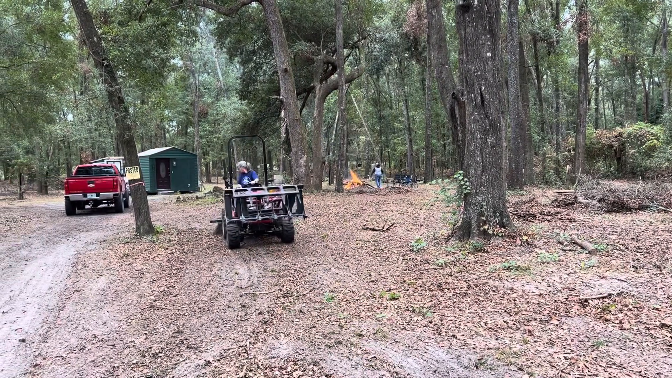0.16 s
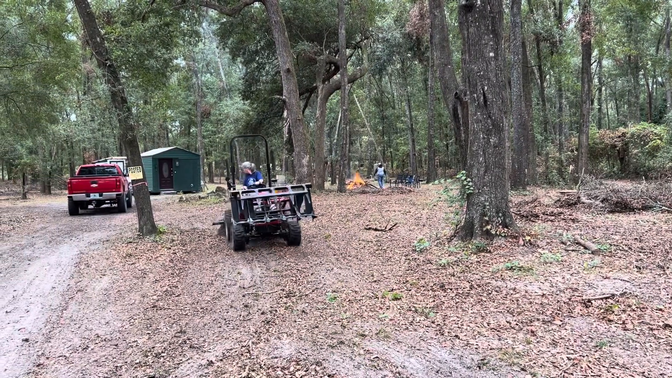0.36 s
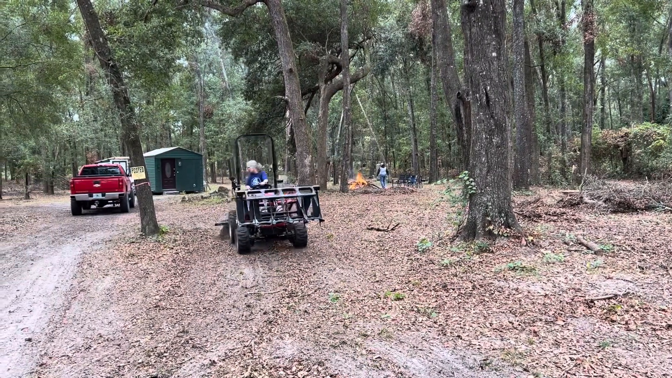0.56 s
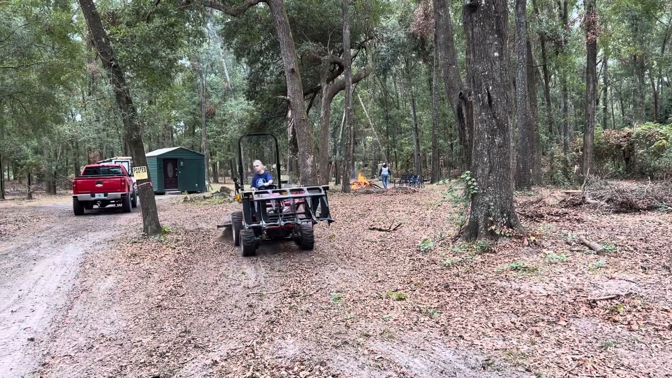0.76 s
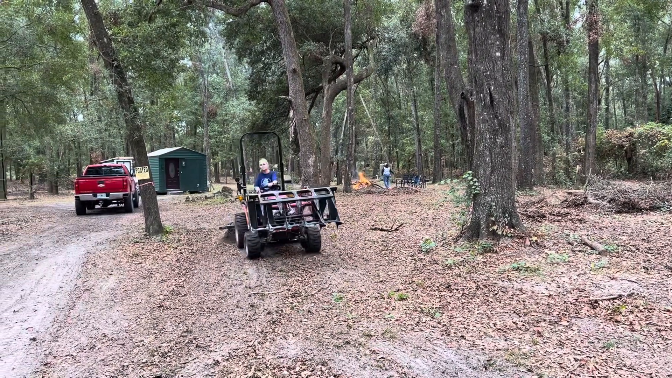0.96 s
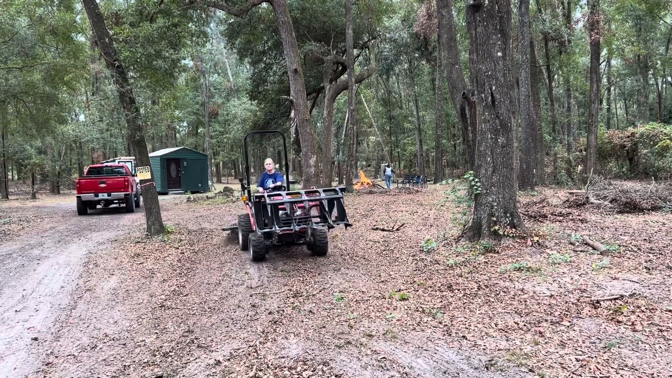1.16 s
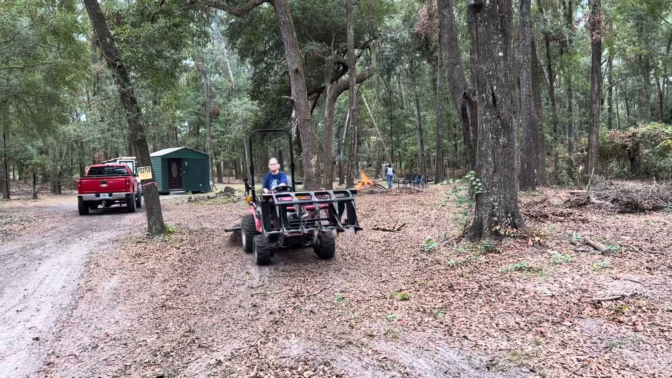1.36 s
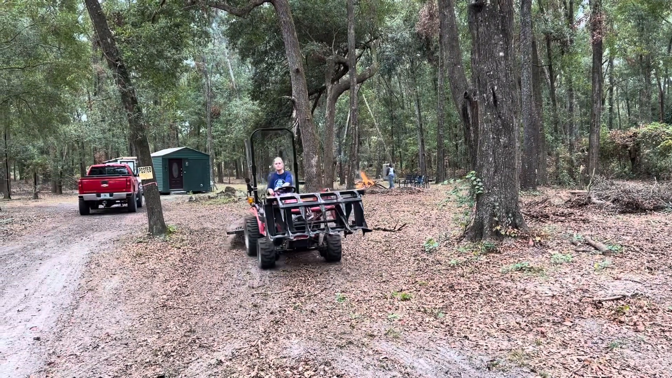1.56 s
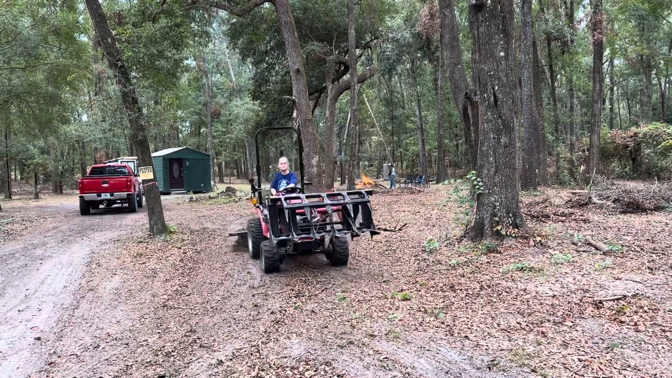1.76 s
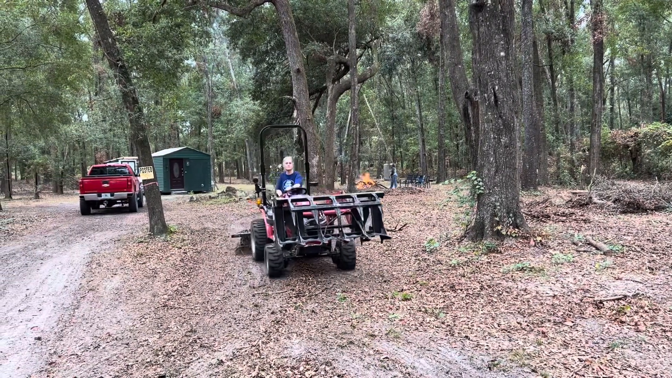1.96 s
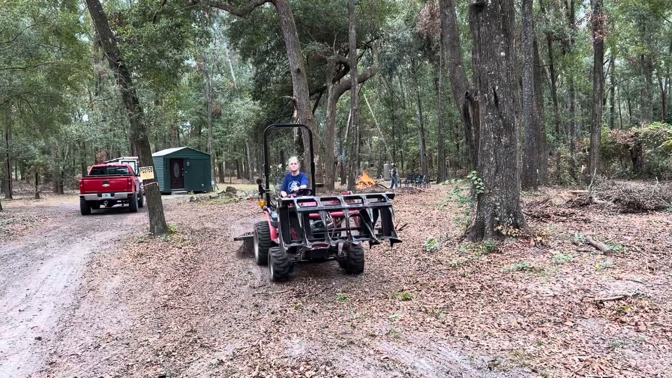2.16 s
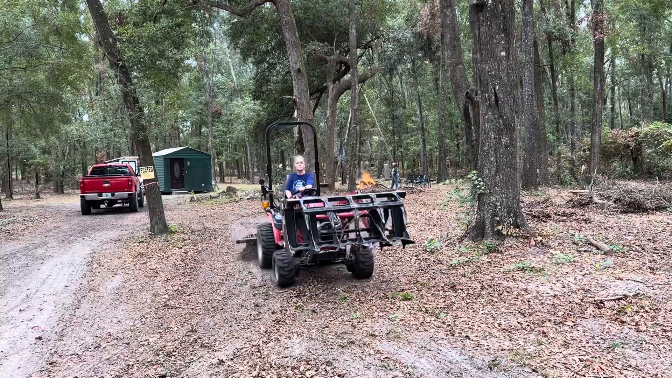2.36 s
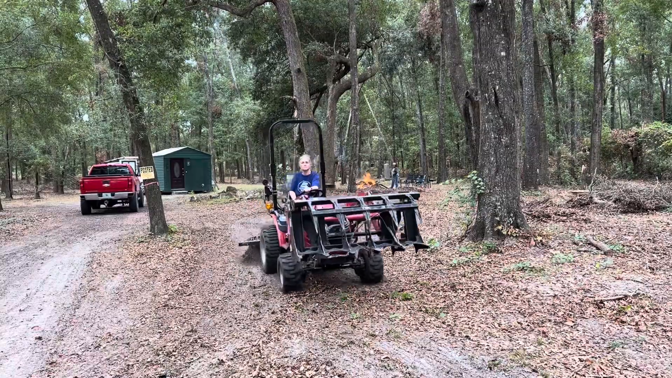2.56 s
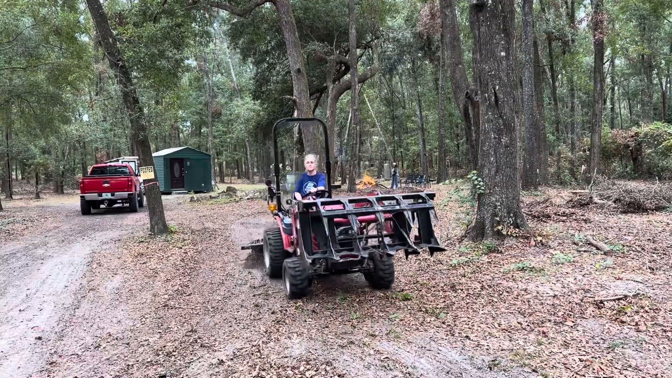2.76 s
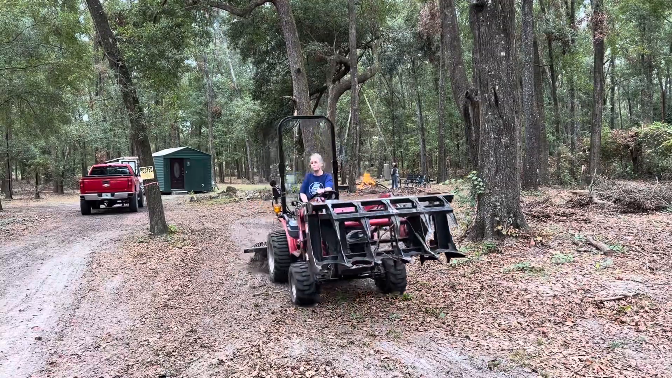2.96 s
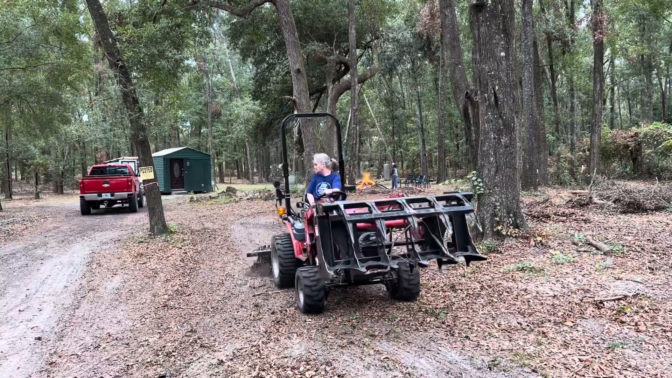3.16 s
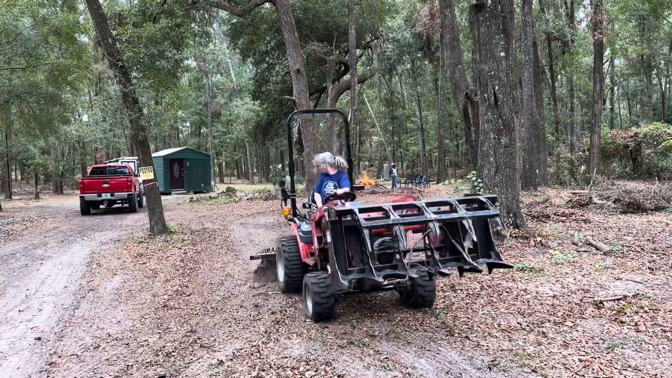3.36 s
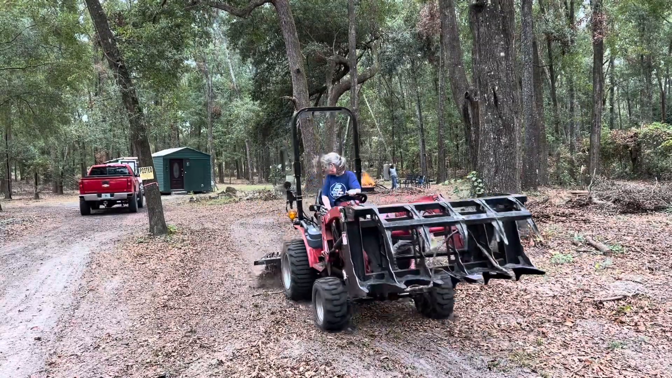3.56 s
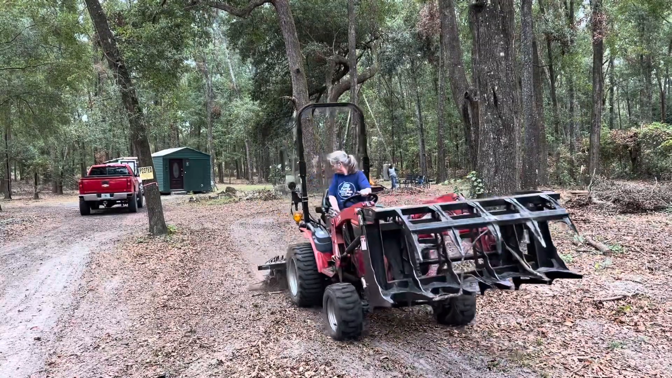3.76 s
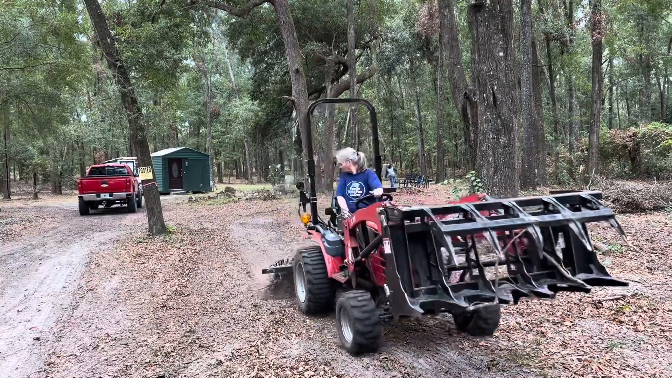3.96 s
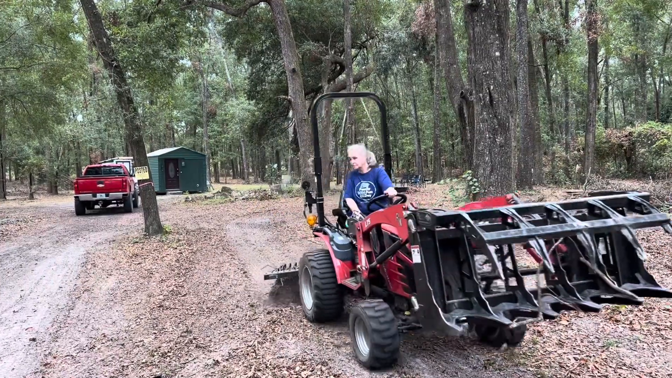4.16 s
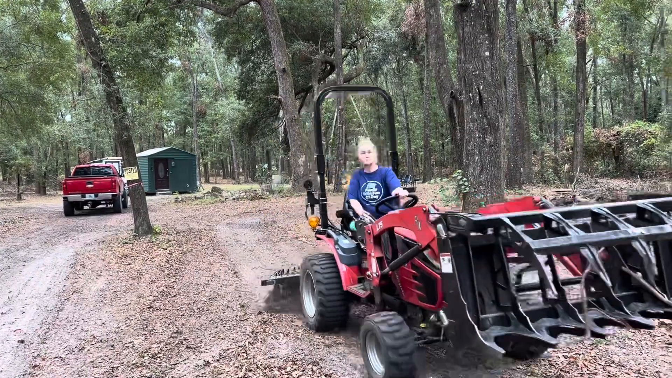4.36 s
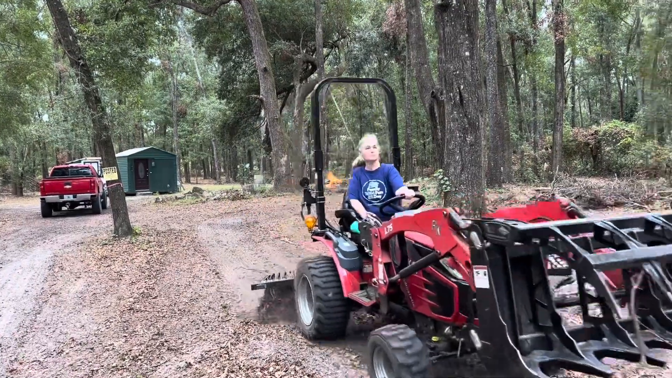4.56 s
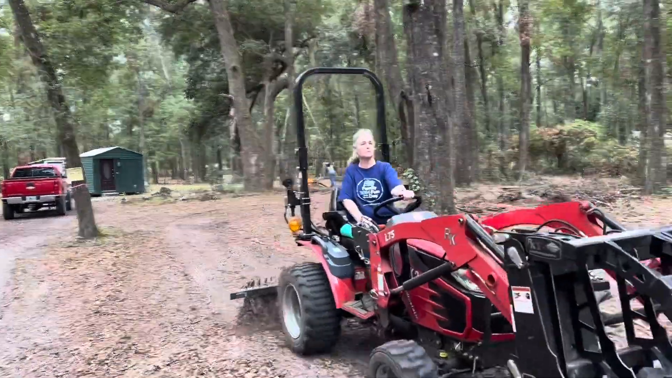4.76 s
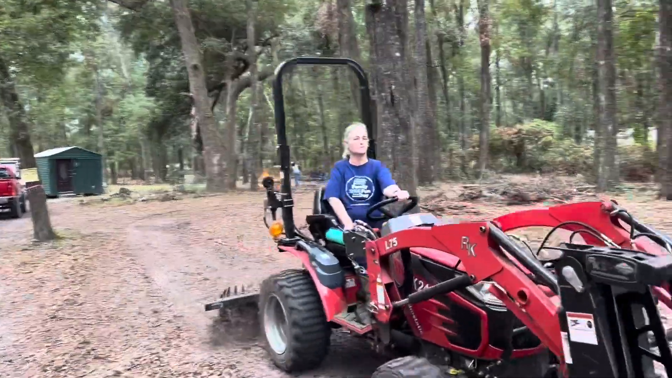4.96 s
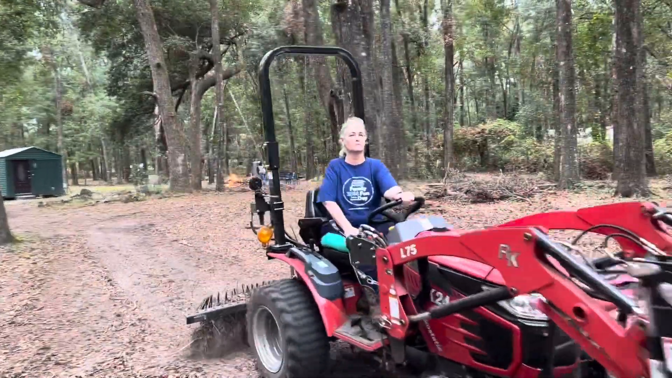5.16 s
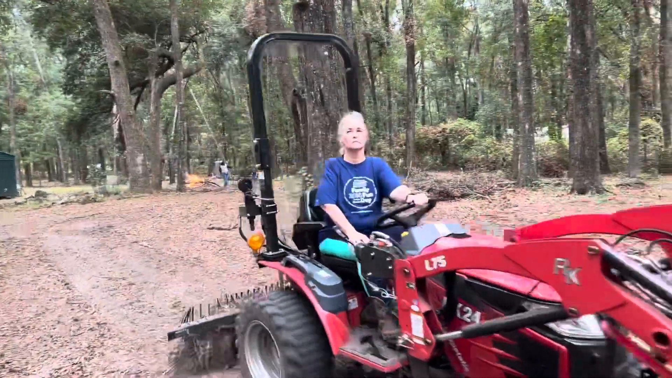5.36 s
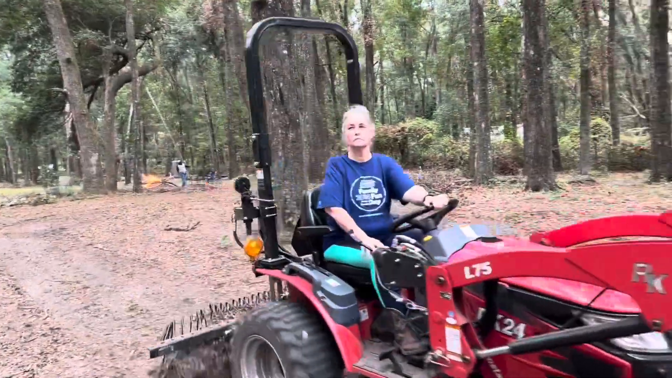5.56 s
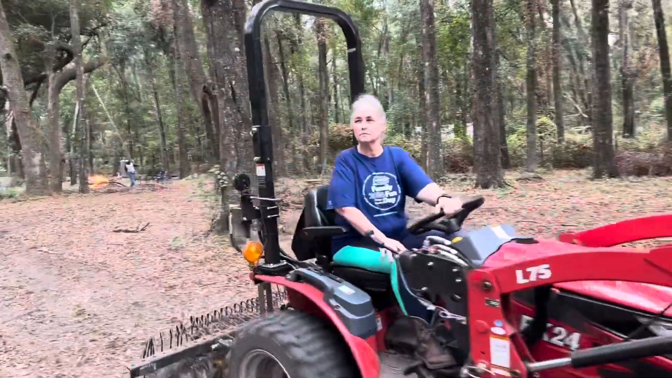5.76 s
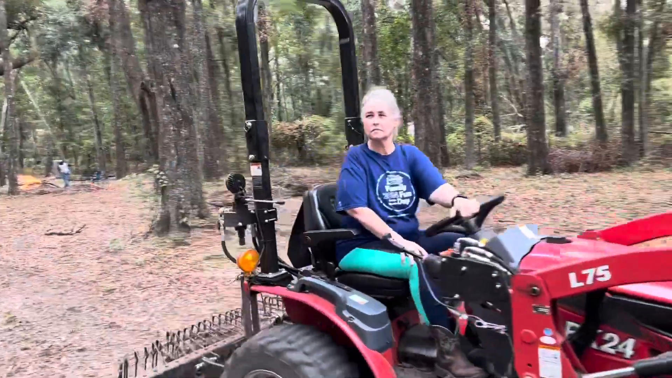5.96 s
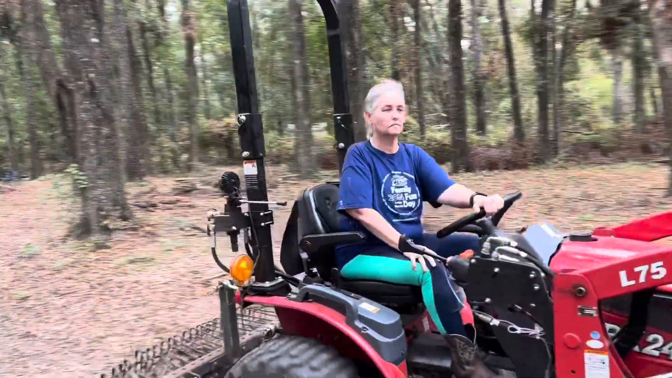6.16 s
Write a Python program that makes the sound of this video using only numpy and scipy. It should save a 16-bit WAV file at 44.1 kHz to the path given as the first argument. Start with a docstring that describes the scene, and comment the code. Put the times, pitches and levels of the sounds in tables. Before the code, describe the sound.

A small diesel tractor drones steadily closer and louder, dragging a steel rake that jangles and scrapes through dirt and dry leaves.

```python
"""A small three-cylinder diesel tractor drives up at steady throttle and passes close by in a clearing.
Its exhaust drones with the firing pulses, and the blows of combustion make the engine block clatter.
The fan hums, the hood booms, gears and hydraulics whine, and a hollow howl rises as it comes side on.
Behind it a rake with springy steel teeth (tines) jangles, clanks and scrapes through the dirt.
Dry leaves crackle, twigs snap, and the tree trunks scatter the clatter into a short, soft echo."""
import sys
import numpy as np
from scipy import signal
from scipy.fft import rfft, irfft, next_fast_len
from scipy.io import wavfile
from scipy.ndimage import map_coordinates

SR = 44100
rng = np.random.default_rng(int(sys.argv[2]) if len(sys.argv) > 2 else 0)


def generate_wav(sig):
    """Save sig (samples, or channels by samples) to the path in sys.argv[1] as 16-bit PCM at SR."""
    pcm = np.round(np.clip(np.atleast_2d(sig).T, -1, 1) * 32767).astype(np.int16)
    wavfile.write(sys.argv[1], SR, pcm)


N = 273861


def amp(db):
    """Turn decibels into a number to multiply by."""
    return np.exp(np.asarray(db) * (np.log(10) / 20))


def unit(x):
    """Scale a sound to an average strength (rms) of 1."""
    return x / np.sqrt(np.mean(x ** 2) + 1e-20)


def along(points, hz):
    """Read between (Hz, value) points, with octaves evenly spaced."""
    freqs, values = np.transpose(points)
    return np.interp(np.log(hz + 1), np.log(freqs + 1), values)


def wobble(rate, size=4096):
    """A smooth curve through about `rate` random values a second."""
    span = N * rate / SR
    coarse = map_coordinates(rng.standard_normal(int(span) + 4), [np.linspace(0, span, size)])
    return np.interp(np.arange(N), np.linspace(0, N, size), coarse)


def chances(per_s, size=160):
    """Random moments. Each row: start in samples, then two random numbers from -1 to 1."""
    draws = rng.uniform(-1, 1, (size, 3))
    starts = np.cumsum(1 + draws[:, 0]) / per_s * SR
    return [(int(start), a, b) for start, (_, a, b) in zip(starts, draws) if start < N]


def filtered(x, response):
    """Multiply each frequency in a sound by response(hz)."""
    size = next_fast_len(len(x) + 8192)
    return irfft(rfft(x, size) * response(np.fft.rfftfreq(size, 1 / SR)), size)[:len(x)]


def coloured(x, spectrum):
    """Give a sound the tone colour of a (Hz, dB) table, at strength 1."""
    return unit(filtered(x, lambda hz: amp(along(spectrum, hz))))


def tone(turns, fade_db, fade_rate, blur):
    """A tone whose level and phase drift as its paths through the trees change."""
    phase = 2 * np.pi * (turns + rng.random()) + blur * wobble(24)
    return unit(amp(fade_db * wobble(fade_rate)) * np.sin(phase))


def fuzzy(hz, width_hz):
    """A narrow band of noise around a pitch that may glide."""
    phase = 2 * np.pi * np.cumsum(hz * np.ones(N)) / SR
    return unit(wobble(width_hz) * np.cos(phase) + wobble(width_hz) * np.sin(phase))


def drive_past(speed_m_per_s=1.507, closest_m=2.64, closest_at_s=5.814):
    """A straight pass: the level in dB (0 when closest) and view in degrees (-90 head on, 0 side on)."""
    track_m = speed_m_per_s * (np.arange(N) / SR - closest_at_s)
    far_db = -20 * np.log10(np.hypot(track_m / closest_m, 1))
    view = np.degrees(np.arctan(track_m / closest_m))
    return far_db, view


def beam(view, aim_deg, width_deg):
    """How squarely a beam of sound points at the listener, from 0 to 1."""
    return np.exp(-((view - aim_deg) / width_deg) ** 2 / 2)


def in_view(view, edge_deg, width_deg):
    """Rises from 0 to 1 as the view passes an edge, as when a part comes out from behind a wheel."""
    return (1 + np.tanh((view - edge_deg) / width_deg)) / 2


# The echo among the trees. Each row: frequency in Hz, seconds to fade by 60 dB.
ECHO_FADE = [(100, 0.31), (1500, 0.3), (10000, 0.14)]

def woods(x):
    """Trunks scatter the sound into a thin echo that loses its treble first."""
    hz, t, noise = signal.stft(rng.standard_normal(SR // 2), SR, nperseg=256)
    fade = amp(-60 * t / along(ECHO_FADE, hz)[:, None])
    tail = signal.istft(noise * fade, SR, nperseg=256)[1]
    return signal.fftconvolve(x, tail / np.linalg.norm(tail))[:N]


# The tone colour of a tick. Each row: frequency in Hz, level in dB.
TICK_COLOUR = [(2500, -26), (3800, 8.5), (5200, -4), (6200, 0), (6700, 3.5), (7300, -2), (8200, 2),
               (9400, -12), (10400, -11), (12000, -22), (15500, -33)]

def gritty(x):
    """Give clicks or noise the bright grit shared by leaves, tines and hitch."""
    return coloured(x, TICK_COLOUR)


# The hiss of dry leaves. Each row: frequency in Hz, level in dB.
LEAF_COLOUR = [(2500, -34), (4000, -3), (5200, 2.5), (6200, -1), (6700, 1), (7250, -8), (8200, 0),
               (8800, -6.5), (9400, -17), (10300, -6), (11100, -13), (12000, -26), (15500, -32)]

def leaves(far_db, view, cracks_per_s=140, tyre_db=2.0):
    """Dry leaves rustle and crack in clumps, a little louder while the near tyres face the listener."""
    rustle = coloured(rng.standard_normal(N), LEAF_COLOUR) * amp(1.37 * wobble(50) + 1.3 * wobble(250))
    cracks = rng.random(N) < cracks_per_s / SR * amp(5 * wobble(25))
    sizes = rng.choice([-1, 1], N) * amp(-2.5 * np.minimum(rng.exponential(size=N), 4))
    level_db = -59.5 + far_db + tyre_db * beam(view, aim_deg=-49, width_deg=12)
    return amp(level_db) * (rustle + amp(-7.5) * gritty(cracks * sizes))


# The thickest twigs snapping. Each row: start in seconds, relative level in dB.
THICK_TWIGS = [(.688, -59), (.7713, -56), (1.2836, -49), (1.8005, -54), (1.9761, -58), (2.1392, -55),
               (3.4647, -53), (3.4991, -48), (3.5804, -47), (3.7421, -54), (3.7795, -50), (3.793, -52),
               (4.0658, -49), (4.2822, -48), (4.4365, -51), (4.4899, -49), (4.5268, -49), (4.8141, -48),
               (4.9328, -46), (5.3675, -44), (5.7179, -42)]
# The tone colour of a snap. Each row: frequency in Hz, level in dB.
TWIG_COLOUR = [(4000, -25), (6700, 0), (7300, -12), (7800, 5), (8250, 4), (8700, -3), (9400, -17),
               (10400, -11), (12000, -22), (15500, -30)]

def twigs(far_db, thin_per_s=4, fade_s=0.048, rise_s=0.0004):
    """Twigs splinter under the tyres in short, bright bursts; thin ones break at random."""
    bursts, t = np.zeros(N + SR), np.arange(SR // 10) / SR
    thin = [(i / SR, -54 + far_db[i] + 2.5 * force) for i, force, _ in chances(thin_per_s)]
    for start_s, db in THICK_TWIGS + thin:
        bursts[int(start_s * SR):][:len(t)] += amp(db - 5.5 - 60 * t / fade_s) * (1 - np.exp(-t / rise_s))
    return bursts[:N] * coloured(rng.standard_normal(N), TWIG_COLOUR)


# Sandy dirt under the tines. Each row: frequency in Hz, level in dB.
DIRT_COLOUR = [(2000, -21), (2700, 6), (3100, -2.5), (3400, 7), (3900, 3), (4600, -17), (6200, -16),
               (6700, -6), (7400, -13), (8600, -10), (9500, -17.5), (11000, -22), (12500, -35)]

def scraping(far_db, rake_clear, hidden_db=30):
    """The tines drag through sandy dirt in quick, uneven jerks."""
    jerks_db = 2 * wobble(60) + 2.1 * wobble(300)
    level_db = -44.5 + far_db - hidden_db * (1 - rake_clear) + jerks_db
    return amp(level_db) * coloured(rng.standard_normal(N), DIRT_COLOUR)


# The hardest tine strikes. Each row: start in seconds, relative level in dB, pitch in Hz.
HARD_STRIKES = [(1.292, -39.5, 2330), (1.5214, -36, 2320), (1.8018, -37, 2130), (1.8632, -33.5, 2147),
                (2.5132, -34, 2140), (3.7913, -34, 2350), (3.838, -35, 2225), (4.028, -32, 2260),
                (4.0746, -33.5, 2290), (4.1859, -34.5, 2220), (4.222, -35.5, 2210), (4.2812, -31, 2250),
                (4.9322, -33, 2090), (5.0589, -28.5, 2240), (5.1088, -24, 2200), (5.1696, -26, 2200),
                (5.2071, -25.5, 2200), (5.2484, -35, 2140), (5.3244, -31, 2120), (5.3654, -33, 2130),
                (5.5253, -28, 2156), (5.5644, -31, 2210), (5.6422, -24, 2183), (5.693, -24.5, 2200),
                (5.7225, -19.5, 2160), (5.7553, -27, 2223), (5.768, -28.5, 2180), (5.7915, -21.5, 2200),
                (5.8316, -26, 2200), (5.9189, -28, 2280), (5.9589, -28, 2280), (5.9918, -25, 2250),
                (6.103, -31, 2330), (6.1794, -28, 2240)]
# How a tine rings. Each row: multiple of its pitch, width in Hz, level in dB, seconds to fade by 60 dB.
TINE_RING = [(0.861, 200, -3, 0.07), (1.001, 80.5, 2, 0.13), (1.08, 180, -2, 0.059),
             (1.26, 398, -12, 0.042), (1.72, 300, -14, 0.052)]

def rake(far_db, rake_clear, light_per_s=10, tine_hz=2200, rise_s=0.0019):
    """Tines snap back from the ground: a faint gritty tick and the ring of a few nearly equal springs."""
    out, t = np.zeros(N + SR), np.arange(SR // 6) / SR
    grit = gritty(rng.standard_normal(N + SR))
    light_db = -43.5 + far_db + 5.5 * rake_clear
    light_strikes = [(i / SR, light_db[i] + 4 * force, tine_hz + 77 * detune)
                     for i, force, detune in chances(light_per_s)]
    for start_s, db, pitch_hz in HARD_STRIKES + light_strikes:
        ring, start = 0, int(start_s * SR)
        for multiple, width_hz, ring_db, fade_s in TINE_RING:
            spread, phase = rng.uniform(-1, 1, (2, 4, 1))  # four springs
            spring_hz = pitch_hz * multiple + width_hz * spread / 2
            springs = np.sin(2 * np.pi * spring_hz * t + np.pi * phase).sum(axis=0)
            ring = ring + amp(ring_db - 60 * t / fade_s) * unit(springs)
        tick = grit[start:][:len(t)] * amp(-14 - 60 * t / 0.045)
        out[start:][:len(t)] += amp(db - 8) * (amp(-1) * ring + tick) * (1 - np.exp(-t / rise_s))
    return out[:N]


# Knocks of the loose pins and links that hold the rake.
# Each row: start in seconds, relative level in dB, pitch in Hz, tick level in dB against the clank.
HITCH_KNOCKS = [(1.523, -46, 3900, -10), (2.514, -46, 3820, -6), (3.465, -46, 3900, -6),
                (4.283, -50, 3700, -4), (4.979, -42, 3300, -6), (5.128, -33, 2700, -13),
                (5.251, -35, 2750, -5), (5.333, -34, 2650, -9), (5.364, -29, 2650, -11),
                (5.523, -30, 2730, -13), (5.557, -33, 3000, -10), (5.568, -38, 4000, 0),
                (5.6447, -27.5, 2850, -7.5), (5.718, -45, 3760, -1), (5.725, -36.5, 2600, -13),
                (5.757, -37, 3800, -11), (5.795, -36, 3600, -6), (5.830, -33.5, 3500, -7),
                (5.922, -35, 3900, -9), (5.932, -39, 2700, -12), (5.957, -31.5, 3820, -8),
                (5.995, -32.5, 3650, -10), (6.106, -34.5, 3900, -8), (6.181, -32.5, 3300, -15)]

def hitch(width_hz=1250, rise_s=0.0005, fade_s=0.028, bounce_db=-14):
    """Steel links knock together and bounce once: a hard, short clank with a bright tick on top."""
    def contact(age):
        return (1 - np.exp(-age / rise_s)) * amp(-60 * age / fade_s)

    out, t = np.zeros(N + SR), np.arange(SR // 10) / SR
    for start_s, db, pitch_hz, tick_db in HITCH_KNOCKS:
        bounce_s = rng.uniform(0.004, 0.012)
        envelope = np.hypot(contact(t), amp(bounce_db) * contact(np.maximum(t - bounce_s, 0)))
        noise = rng.standard_normal(len(t))
        steel = unit(filtered(noise, lambda hz: 1 / (1 + (2 * (hz - pitch_hz) / width_hz) ** 4)))
        tick = amp(tick_db) * gritty(rng.standard_normal(len(t)))
        out[int(start_s * SR):][:len(t)] += amp(db - 3) * envelope * (steel + tick)
    return out[:N]


def hood(far_db, view, grille_db=11):
    """The air under the hood booms, loudest while the grille faces the listener."""
    level_db = -63.5 + far_db + grille_db * beam(view, aim_deg=-25, width_deg=13.4)
    return amp(level_db) * fuzzy(hz=238, width_hz=45)


def axle(far_db, view, turns_per_s=2.62, peak_s=3.56):
    """The axle gears mesh harder once per turn; their rough whine comes in waves once the side shows."""
    turns = turns_per_s * (np.arange(N) / SR - peak_s)
    showing = in_view(view, edge_deg=-58, width_deg=4)
    swell_db = 5.5 * showing * np.cos(2 * np.pi * turns)
    return amp(-49 + far_db + swell_db - 3.3 * (1 - showing)) * fuzzy(hz=1647, width_hz=60)


# Tones of the gears and belt pulleys.
# Each row: vibrations per engine cycle, level in dB, aim of its beam in degrees, boost in the beam in dB.
GEAR_TONES = [(21.94, -54.5, -32, 11.5), (23.07, -55.5, -69, 5.5), (26.86, -58, 6, 10),
              (35.85, -58.5, -16, 8), (46.33, -57, -65, 6.5), (48.85, -57, -20, 17.5),
              (52.96, -52.5, -48, 2), (58, -58.5, -5, 11), (61.8, -57, -45, 5), (63.1, -52.5, -77, 2.5),
              (82.9, -65, -42, 15)]

def gears(cycle, far_db, view):
    """Gears and pulleys sing faintly; each tone swells as its beam sweeps past."""
    out = 0
    for multiple, db, aim_deg, boost_db in GEAR_TONES:
        whine = tone(multiple * cycle, fade_db=2.0, fade_rate=18, blur=0.0075 * multiple)
        out = out + amp(db + boost_db * beam(view, aim_deg, width_deg=3.7)) * whine
    return amp(far_db) * out


# Tones of the pump. Each row: multiple of the piston rate, relative level in dB.
PUMP_TONES = [(3, -2.3), (4, -2), (5, -12.5), (6, -28), (7, -22), (8, -26.5), (9, -26.5), (10, -23.5),
              (11, -34)]
# Beams that those tones throw past the wheels and the loader.
# Each row: multiple of the piston rate, aim in degrees, width in degrees, boost in dB.
PUMP_TONE_BEAMS = [(3, -74, 1.1, 8), (3, -62, 1.3, 3), (3, -48, 2.1, 6.5), (3, -37, 1.7, 5.5),
                   (3, 11.5, 3.3, 20), (4, -29.5, 4.4, 7), (4, 8, 3.5, 11), (5, -38.5, 2.3, 7.5),
                   (5, -30.5, 1.2, 8), (5, 4, 19, 12), (9, -69, .5, 11), (9, -55.1, 0.71, 15),
                   (9, -46, 2.3, 9.5), (9, -40, 2.5, 6), (10, -56.5, .7, 5), (10, -50.5, 1.3, 7),
                   (11, -54, 1.2, 14.5), (11, -49, 2.3, 17)]

def hydraulics(cycle, far_db, view, gap_db=4):
    """Nine pump pistons make the drive whine; all its tones swell in the gap between the wheels."""
    strokes, out = cycle * 18, 0  # nine pistons, two crankshaft turns per cycle
    for multiple, db in PUMP_TONES:
        beams_db = sum(boost_db * beam(view, aim, width)
                       for owner, aim, width, boost_db in PUMP_TONE_BEAMS if owner == multiple)
        whine = tone(multiple * strokes, fade_db=2.0, fade_rate=14, blur=0.084 * multiple)
        out = out + amp(db + beams_db) * whine
    return amp(-47.5 + far_db + gap_db * beam(view, aim_deg=-38.5, width_deg=3.4)) * out


# The howl as the tractor comes side on. Each row: view in degrees, pitch in Hz, close-up level in dB.
HOWL_BY_VIEW = [(-70, 630, -59), (-60.5, 630, -52), (-42, 626, -44.5), (-32, 645, -41.5), (-23.5, 656, -49),
                (-14, 672, -46), (6.5, 708, -44.5)]

def howl(far_db, view, waver_hz=8.1):
    """A hollow howl rises in pitch as the tractor comes side on: a wavering tone in breathy noise."""
    degrees, hz, db = np.transpose(HOWL_BY_VIEW)
    pitch_hz = np.interp(view, degrees, hz)
    turns = np.cumsum(pitch_hz + waver_hz * wobble(22)) / SR
    core = amp(-1) * tone(turns, fade_db=1.0, fade_rate=12, blur=0.3)
    breath = fuzzy(pitch_hz, width_hz=55)
    return amp(np.interp(view, degrees, db) + far_db) * unit(core + breath)


# The rush of air from the fan. Each row: frequency in Hz, level in dB.
AIR_COLOUR = [(60, -34.5), (220, -12), (400, -11.5), (540, -8), (635, 3), (740, 1.5), (900, -3), (1500, -9),
              (5000, -59)]

def fan(cycle, far_db, view, blades_per_cycle=15.345):
    """The belt-driven blades hum, with a tone an octave up, and blow air out of the side vent."""
    hum_db = -45.5 + far_db + 13 * beam(view, aim_deg=-17, width_deg=15.5)
    hum_db -= 12 * beam(view, aim_deg=-48, width_deg=3.8)  # one narrow quiet direction
    hum_db -= 5 * in_view(view, edge_deg=8.5, width_deg=5.4)  # the grille turns away
    rush_db = -44.5 + far_db - 14 * (1 - in_view(view, edge_deg=-62.5, width_deg=2.9))  # hidden at first
    rush_db += 4 * beam(view, aim_deg=-28, width_deg=22)  # the vent blows at a slant
    blades = cycle * blades_per_cycle
    hum = amp(hum_db) * tone(blades, fade_db=0.94, fade_rate=19, blur=0.06)
    octave = amp(0.28 * rush_db - 38) * tone(2 * blades, fade_db=1.4, fade_rate=9, blur=0.15)
    rush = amp(rush_db) * coloured(rng.standard_normal(N), AIR_COLOUR)
    return hum + octave + rush


# The engine's speed. Each row: time in seconds, firings per second.
FIRING_RATE = [(0, 80.7), (.7, 80.98), (1.05, 80.8), (1.25, 80.38), (1.62, 80.85), (1.87, 80.4),
               (2.05, 80.9), (2.55, 80.5), (3, 80.8), (3.26, 80.08), (3.45, 80.55), (3.8, 80.27),
               (4.33, 80.65), (4.58, 80.3), (4.82, 80.92), (5.25, 80.53), (5.48, 80.65), (5.73, 80.2),
               (6.21, 80.5)]

def engine_cycles(cylinders=3):
    """Count the engine cycles gone by at each sample; every cylinder fires once per cycle."""
    times_s, rates = np.transpose(FIRING_RATE)
    firings_per_s = np.interp(np.arange(N) / SR, times_s, rates)
    return np.cumsum(firings_per_s) / SR / cylinders


def knocking(cycle, tap_db=2.6, repeat_share=0.1, tap_count=7):
    """Combustion and valve blows: a pattern that returns each cycle, mixed with fresh rattle."""
    size = int(N / cycle[-1])  # samples in one cycle
    pattern = map_coordinates(rng.standard_normal(size), [(cycle % 1) * size], mode='grid-wrap')
    rattle = np.sqrt(repeat_share) * pattern + np.sqrt(1 - repeat_share) * rng.standard_normal(N)
    since_firing = (3 * cycle) % 1
    # valves and injectors tap at uneven points of the cycle
    position = np.linspace(0, 1, 256)
    since_tap = (position - rng.random((tap_count, 1))) % 1
    taps = np.exp(-since_tap / 0.02).max(axis=0)
    return rattle * amp(tap_db * np.interp(cycle % 1, position, taps) - 1.6 * since_firing)


# Engine clatter from ahead and from the side. Each row: frequency in Hz, level in dB.
FRONT_COLOUR = [(30, -21.5), (130, -11), (205, -2.5), (300, 3.5), (480, -5.5), (620, -2), (800, -2.5),
                (1100, -1.5), (1400, -0.8), (1700, 0), (2050, -3), (2400, -7.5), (2650, -18), (3150, -21.5),
                (3800, -12), (4500, -26), (9000, -45)]
SIDE_COLOUR = [(30, -17), (130, -18), (220, -25), (320, -2), (480, 4.5), (700, -3.5), (950, -8),
               (1400, 1.8), (1680, 4), (2050, 0), (2400, -7.5), (2650, -13), (3100, -26), (3700, -32),
               (4500, -45), (9000, -63)]

def engine_block(cycle, far_db, view, side):
    """The blows ring the block and panels, loudest side on; the colour shifts as the side comes round."""
    blows = knocking(cycle)
    clatter = (1 - side) * coloured(blows, FRONT_COLOUR) + side * coloured(blows, SIDE_COLOUR)
    level_db = -37.5 + 0.74 * far_db + 4.5 * beam(view, aim_deg=3.7, width_deg=26)
    return amp(level_db + 0.55 * wobble(18)) * clatter


# Exhaust tones. Each row: vibrations per engine cycle, relative level in dB from ahead and from the side.
EXHAUST_TONES = [(2, -23, -22), (2.994, -1, 1.5), (4, -19, -20), (6, 2, -0.5), (7, -4.5, -13),
                 (8.95, -13.5, -6.5), (9.96, -4.5, -7), (11, -9, -19), (11.995, 2.5, -6.5),
                 (13.94, -9, -4.5), (21.73, -22, -8)]

def exhaust(cycle, far_db, side):
    """The firing pulses leave the muffler as low tones; the higher ones waver more."""
    out = 0
    for multiple, ahead_db, side_db in EXHAUST_TONES:
        drone = tone(multiple * cycle, fade_db=0.12 * multiple, fade_rate=2.57, blur=0.0071 * multiple)
        out = out + amp(ahead_db + side * (side_db - ahead_db)) * drone
    return amp(-46.5 + far_db) * out


def scene():
    """The tractor passes: distance and view set the levels, and from ahead its body hides the rake."""
    cycle = engine_cycles()
    far_db, view = drive_past()
    side = 0.93 * in_view(view, edge_deg=-45, width_deg=31)  # the open side of the engine bay
    rake_clear = in_view(view, edge_deg=-37.5, width_deg=33)  # out from behind the wheels
    drone = exhaust(cycle, far_db, side) + fan(cycle, far_db, view)
    whine = hydraulics(cycle, far_db, view) + gears(cycle, far_db, view)
    ground = scraping(far_db, rake_clear) + leaves(far_db, view) + twigs(far_db)
    rough_tones = howl(far_db, view) + axle(far_db, view) + hood(far_db, view)
    rattle = engine_block(cycle, far_db, view, side) + ground + rake(far_db, rake_clear) + hitch()
    return (drone + whine + rough_tones + rattle + amp(-13.5) * woods(rattle))[None]


def record(dry, top_hz=15700):
    """Cut away the very highest treble."""
    return filtered(dry[0], lambda hz: hz < top_hz)[None]


dry = scene()
out = record(dry)
generate_wav(out)
```